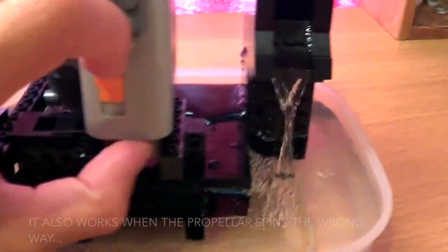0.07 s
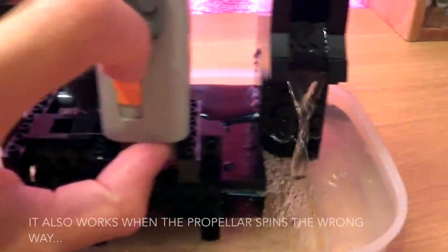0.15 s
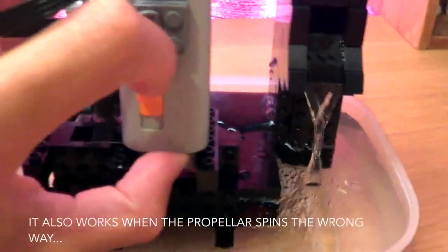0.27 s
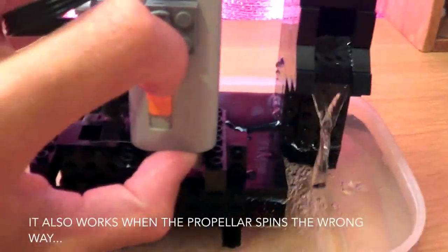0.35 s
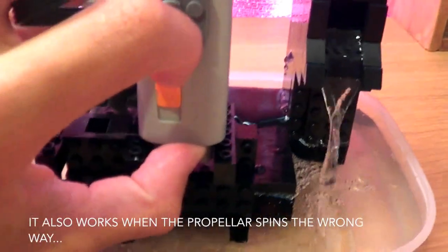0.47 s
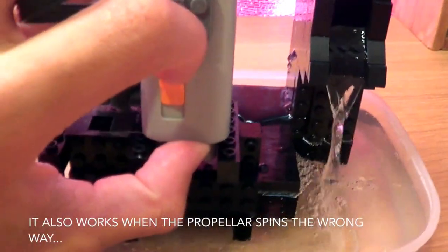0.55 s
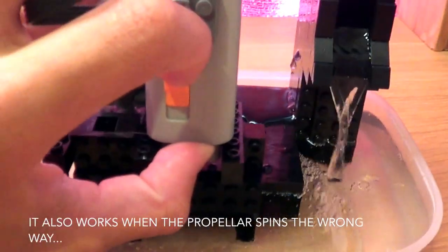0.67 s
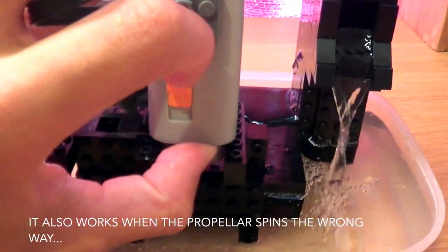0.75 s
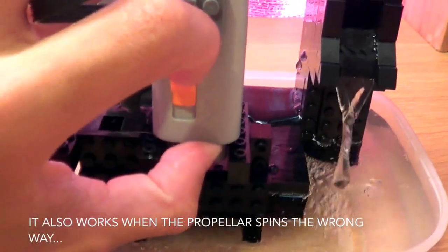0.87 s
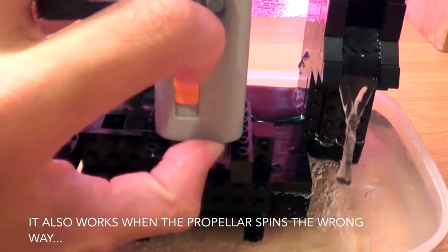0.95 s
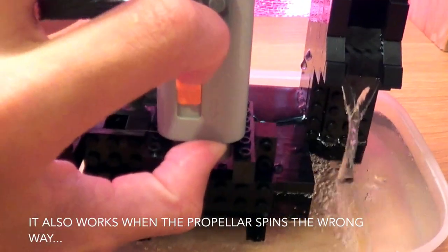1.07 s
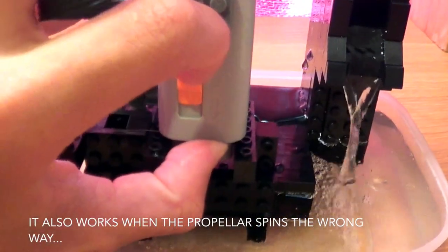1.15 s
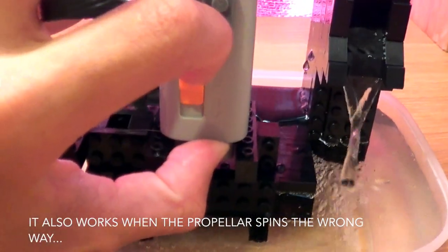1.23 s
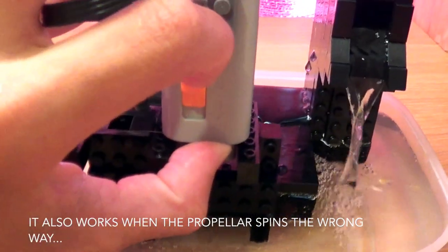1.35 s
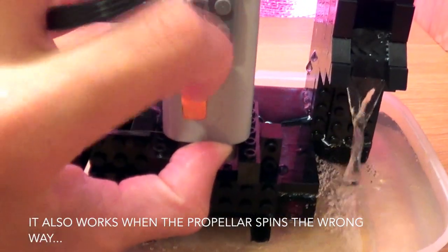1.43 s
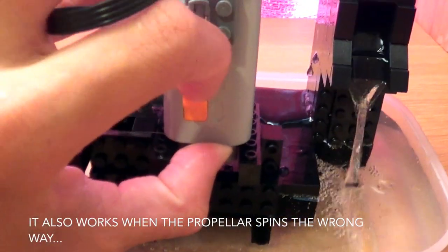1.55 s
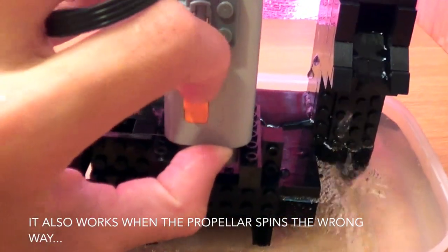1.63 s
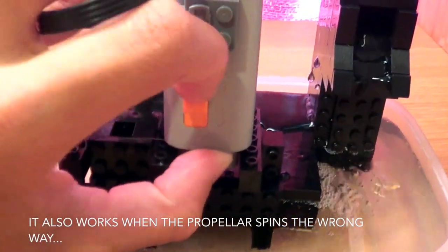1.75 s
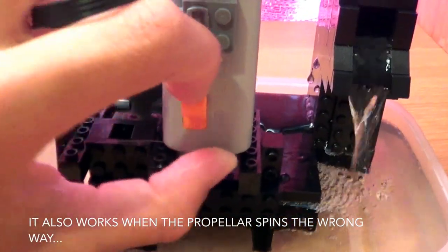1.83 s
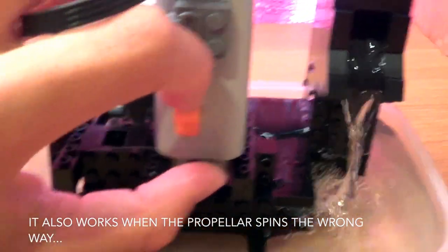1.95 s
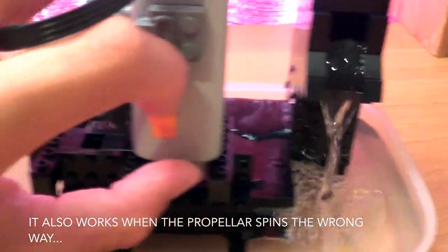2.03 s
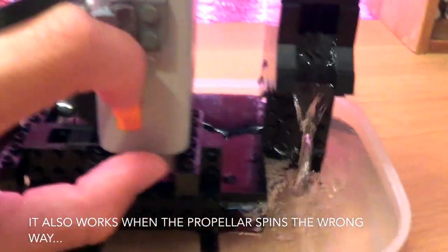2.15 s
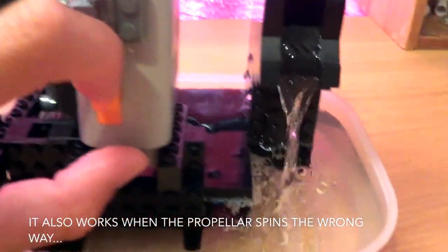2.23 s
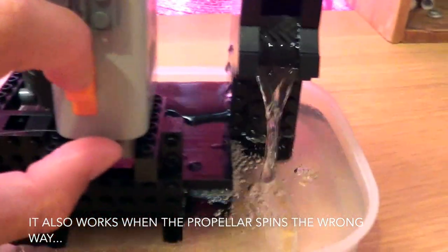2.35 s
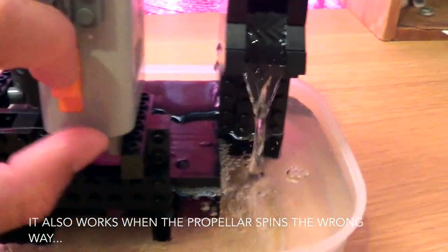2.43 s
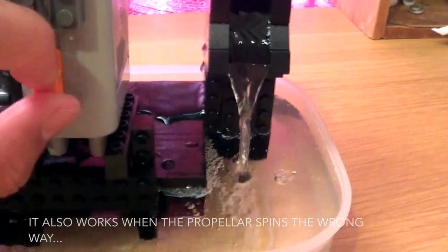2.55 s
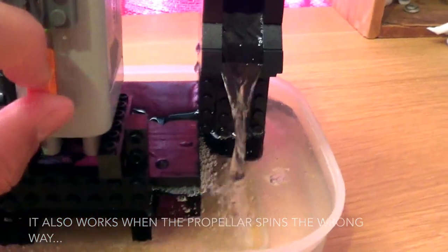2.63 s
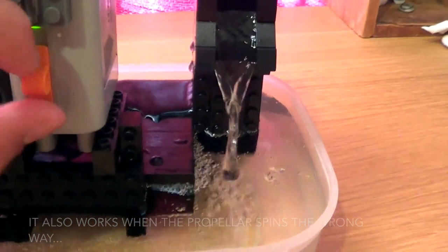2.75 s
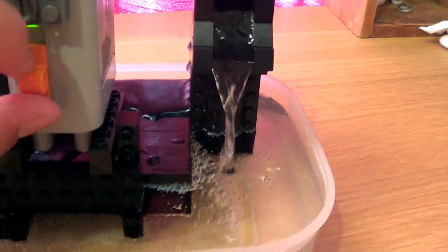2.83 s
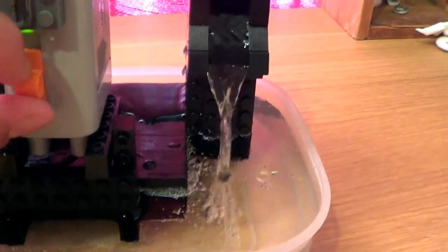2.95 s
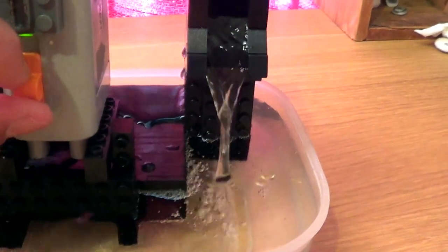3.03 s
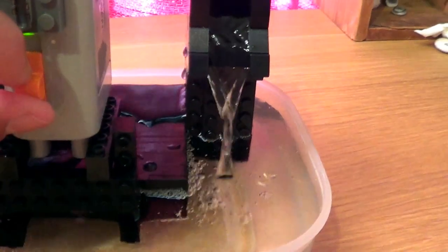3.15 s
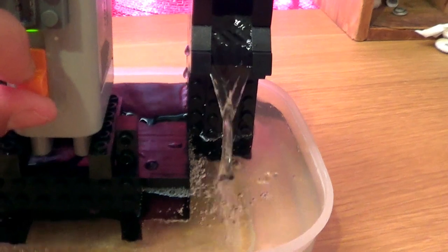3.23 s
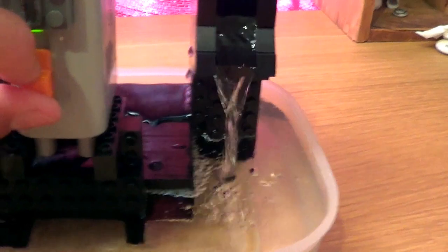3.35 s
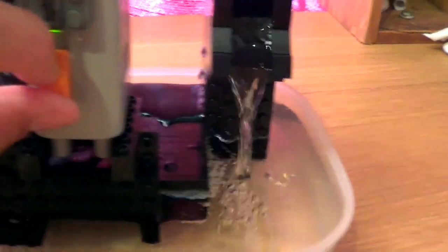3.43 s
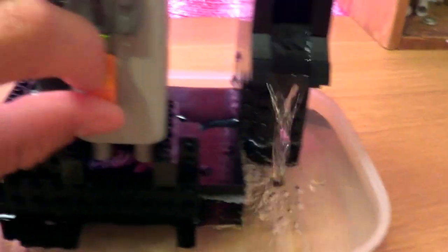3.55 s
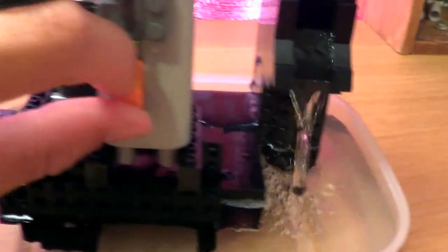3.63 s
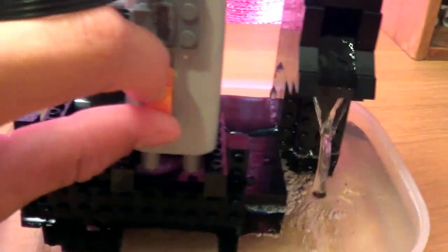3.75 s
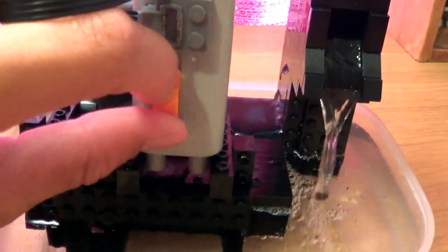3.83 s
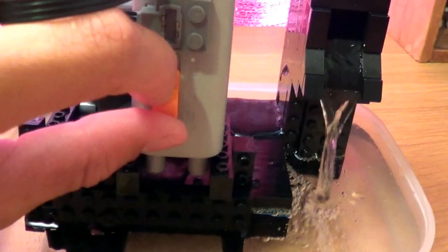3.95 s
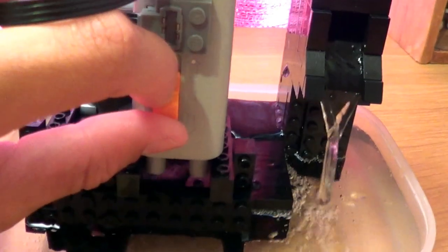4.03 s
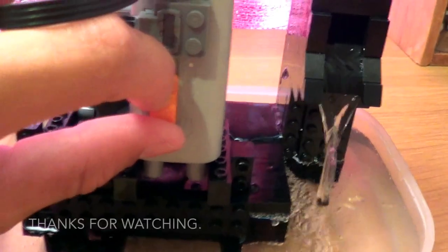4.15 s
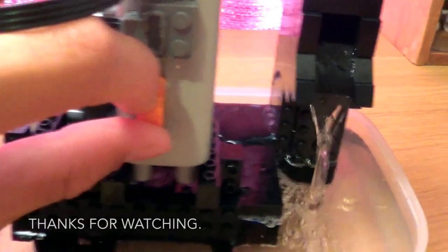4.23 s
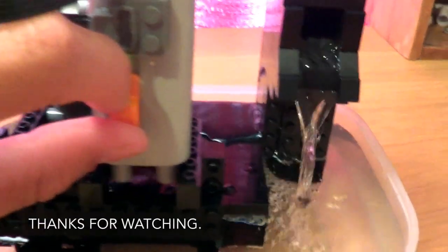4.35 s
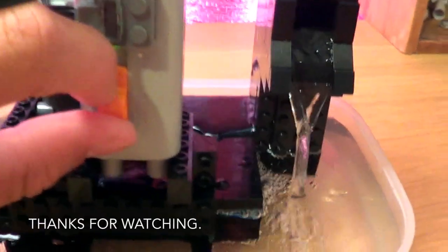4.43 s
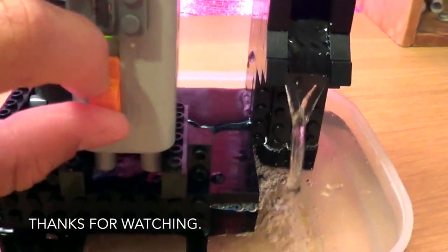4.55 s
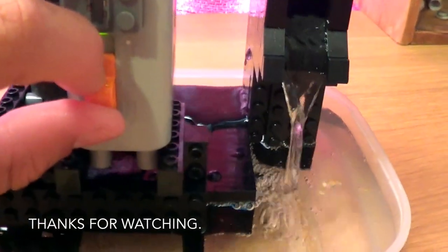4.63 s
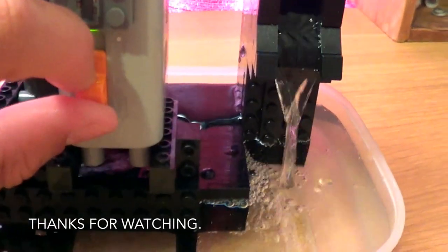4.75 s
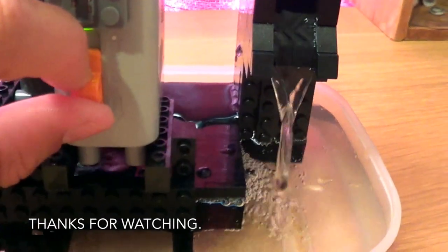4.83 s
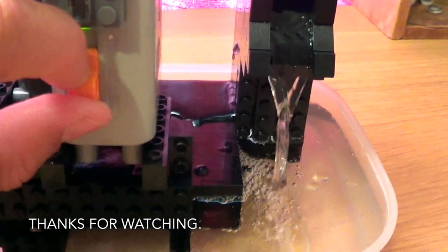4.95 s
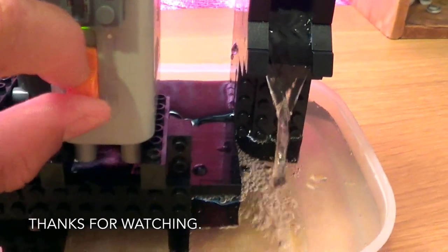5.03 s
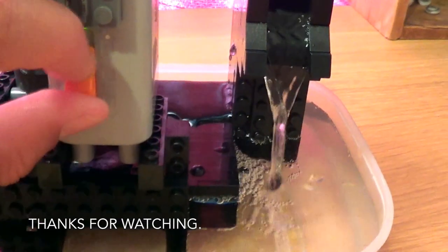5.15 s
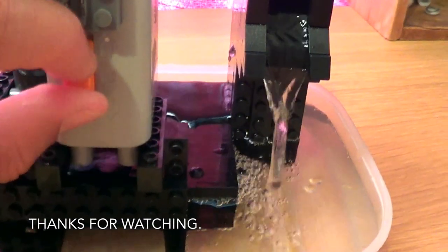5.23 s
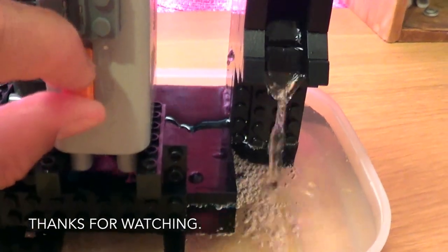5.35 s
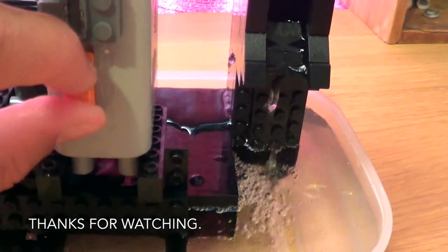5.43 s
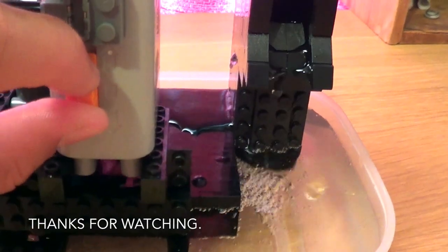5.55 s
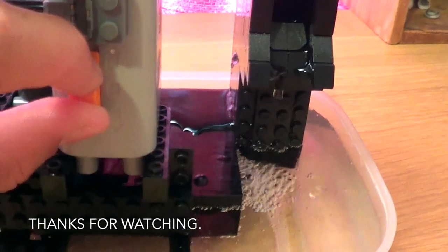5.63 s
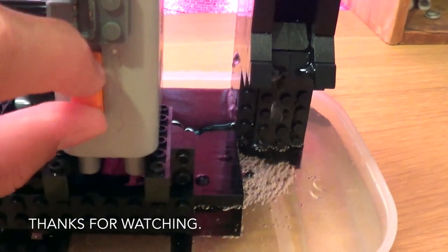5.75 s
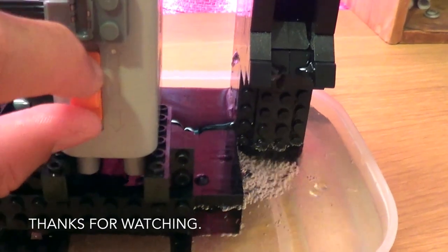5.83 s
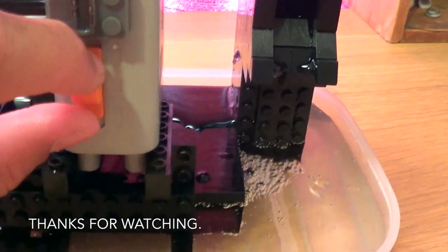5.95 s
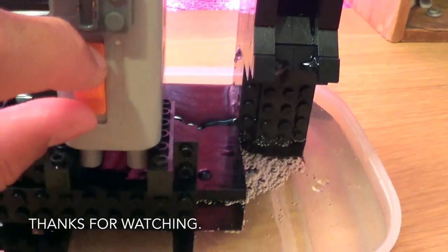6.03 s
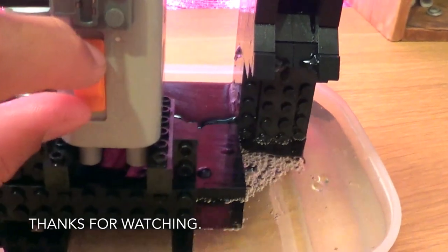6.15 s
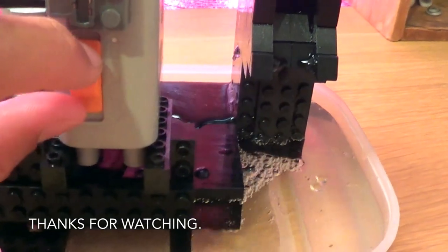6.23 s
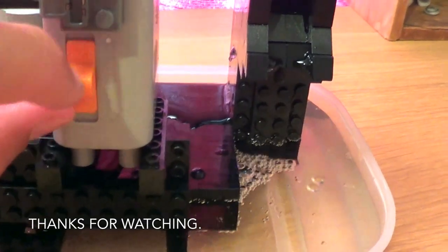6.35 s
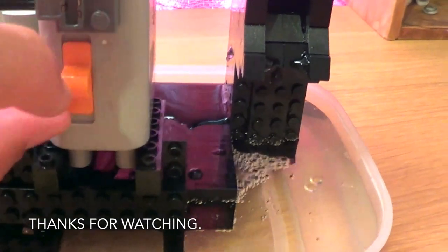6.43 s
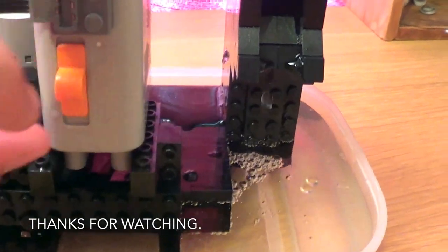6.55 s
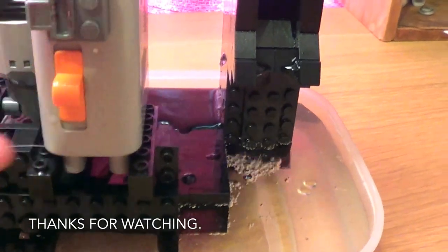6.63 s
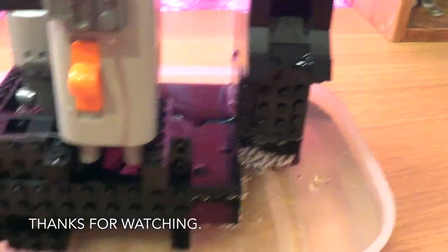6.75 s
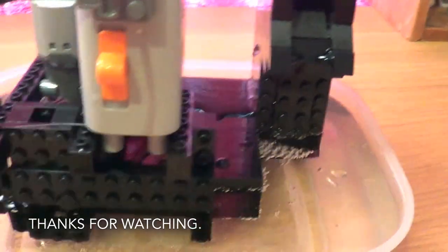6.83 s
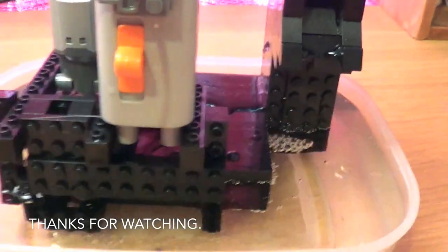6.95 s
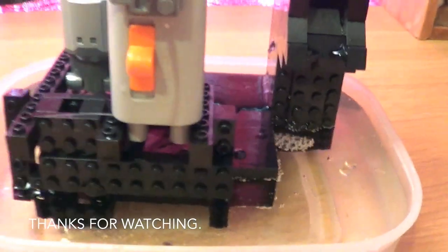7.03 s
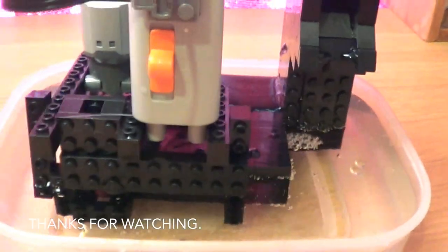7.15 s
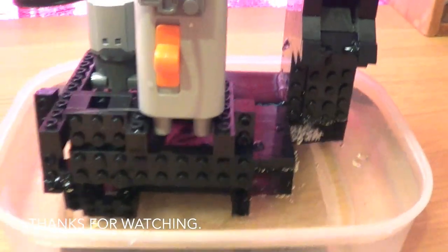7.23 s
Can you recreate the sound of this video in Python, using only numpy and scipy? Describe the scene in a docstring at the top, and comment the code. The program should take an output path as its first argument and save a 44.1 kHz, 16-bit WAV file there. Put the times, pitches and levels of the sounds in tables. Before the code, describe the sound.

Very close, a toy motor drives a harsh, bright plastic gear clatter with a faint whine, over a thin bubbling jet of water. A sharp double click makes it dip and spin up again in reverse. Later it winds down fast with a click; water gurgles and splutters, drops tick, foam fizzes, and fingers slide and click on plastic. Small dry room, faint hiss.

```python
"""In a tub of water, close by, a toy motor drives a plastic-brick pump: it runs one way, is reversed, and is switched off.
Gear teeth strike and scrape, exciting the resonances of the frame, over the bubbles of a thin splashing jet.
Afterwards the water drains with gurgling bubbles, and drops and foam tick as short damped rings.
Fingers slide on the battery box as coloured grains of friction; the switch and loose plastic click as noise bursts."""
import sys
import numpy as np
from scipy import signal
from scipy.fft import rfft, irfft
from scipy.io import wavfile
from scipy.ndimage import uniform_filter1d

SR = 44100
rng = np.random.default_rng(int(sys.argv[2]) if len(sys.argv) > 2 else 0)


def dump(signal):
    """Clip the signal to [-1, 1] and save it as 16-bit WAV at the path in sys.argv[1]."""
    limited = np.clip(np.atleast_2d(signal).T, -1, 1)
    pcm = np.round(limited * 32767).astype(np.int16)
    wavfile.write(sys.argv[1], SR, pcm)


N = 321043
TIME = np.arange(N) / SR

# the switch cuts the forward run, starts the reverse run, and at last turns the motor off (s)
CUT_S, REVERSE_S, OFF_S = 1.52, 1.529, 5.26


def gain_of(db):
    """Level in decibels to amplitude ratio."""
    return 10 ** (np.asarray(db) / 20)


def evened(x):
    """Normalises the mean power: rms 1."""
    return x / np.sqrt(np.mean(x ** 2) + 1e-20)


def read(points, hz):
    """Interpolates a spectrum along a logarithmic frequency axis."""
    f, value = np.transpose(points)
    return np.interp(np.log(hz + 1), np.log(f + 1), value)


def add(mix, s, sound):
    """Superposition: adds a sound to the mix from time s on."""
    part = mix[max(round(s * SR), 0):][:len(sound)]
    part += sound[:len(part)]


def pair(mid, side):
    """Sum and difference stereo: left and right from what they share and what differs."""
    return np.array([mid + side, mid - side])


def stroke(s, db, rise_s, fall_s):
    """Gaussian envelope: a smooth swell to a peak and away again, with 1/e times for the two sides."""
    return gain_of(db) * np.exp(-((TIME - s) / np.where(TIME < s, rise_s, fall_s)) ** 2)


def colour(x, db_at, size=4096):
    """Minimum-phase filtering with the gain db_at(Hz): causal, so blows ring after they land."""
    cepstrum = irfft(np.log(gain_of(db_at(np.fft.rfftfreq(size, 1 / SR))) + 1e-6))
    # folding the cepstrum onto positive times makes the filter causal
    cepstrum[1:size // 2] *= 2
    cepstrum[size // 2 + 1:] = 0
    response = irfft(np.exp(rfft(cepstrum)))
    return signal.oaconvolve(x, response)[:len(x)]


def wander(hz):
    """Low-passed Gaussian noise: slow chance of rms 1, up to about hz."""
    lowpass = np.exp(-(np.fft.rfftfreq(N, 1 / SR) / hz) ** 2)
    return evened(irfft(rfft(rng.standard_normal(N)) * lowpass, N))


def sparks(per_s, spread_db):
    """Poisson-like impulses of random sign, their levels spread exponentially."""
    level_db = spread_db * np.minimum(rng.exponential(1, N), 4)
    size = gain_of(level_db) * rng.choice([-1, 1], N)
    return size * (rng.random(N) < per_s / SR)


def bubble(hz, t60, rise):
    """Resonance of an air bubble: a damped ring that starts at hz and rises in pitch as it dies."""
    t = np.arange(int(abs(t60) * SR) + 2) / SR
    ring = np.sin(2 * np.pi * hz * t * (1 + rise * t / t60))
    decay = np.exp(-np.log(1000) * t / t60)
    onset = 1 - np.exp(-hz * t)
    return ring * decay * onset


def bubbles(per_s, low_hz, high_hz, cycles, spread_db, rise, count=30):
    """Superposed bubble resonances: each size rings at its own pitch on its own random train."""
    pitches = np.geomspace(low_hz, high_hz, count) * np.exp(0.0093 * rng.standard_normal(count))
    return sum(signal.oaconvolve(sparks(per_s / count, spread_db), bubble(hz, cycles / hz, rise))[:N]
               for hz in pitches)


def background(level_db, wide_db):
    """Diffuse room noise, wide in the middle range and near mono in bass and treble, with an electronic whine."""
    # spectrum of the room behind the pump: f/Hz, level/dB
    floor = [(15, -36), (25, 0.5), (213, 4.5), (637, -3.5), (1150, -5.5), (1910, -9.5), (2180, -5.5),
             (2780, -10), (5420, -11.5), (7890, -13.5), (10300, -11.5), (13100, -21), (15000, -9)]
    whine_hz, whine_db = 15624, -55
    spread = [(40, -18), (300, 3), (4000, 1.5), (14000, -18)]  # side: f/Hz, level/dB
    air = evened(colour(rng.standard_normal(N), lambda hz: read(floor, hz)))
    diffuse = evened(colour(rng.standard_normal(N), lambda hz: read(floor, hz) + read(spread, hz)))
    pulsing = 1 + .5 * np.sin(2 * np.pi * 50 * TIME)
    whine = np.sin(2 * np.pi * whine_hz * TIME) * pulsing
    return gain_of(level_db) * pair(air, gain_of(wide_db) * diffuse) + gain_of(whine_db) * whine


def room(x, t60):
    """Reverberation: sparse reflections from tub, table and walls that die away exponentially."""
    t = np.arange(SR // 2) / SR
    arrivals = (rng.random(len(t)) < 3000 / SR) * (t > .002)
    taps = rng.standard_normal(len(t)) * arrivals * np.exp(-np.log(1000) * t / t60)
    return signal.oaconvolve(x, taps / np.linalg.norm(taps))[:N]


def hands(bump_db, bump_hz):
    """Friction as random grains: a finger slides off the box, the hand draws back; a soft bump comes early."""
    # colour of skin sliding over plastic: f/Hz, level/dB
    slide_colour = [(120, -43), (200, -11), (963, -22), (1050, 0), (1150, -18), (2090, -3), (4010, -8.5),
                    (8410, 0.5), (15000, -9)]
    # colour of the hand rustling away: f/Hz, level/dB
    rustle_colour = [(35, -59), (60, -20), (329, 0), (665, -7), (743, -15), (1230, -11), (2570, -15),
                     (5000, -14), (6500, -49), (11000, -120)]
    slide_s, hand_s = 6.68, 7.0  # peaks of the two movements
    grain = evened(sparks(4000, spread_db=0))
    slide = evened(colour(grain, lambda hz: read(slide_colour, hz)))
    slide = slide * stroke(slide_s, db=-40, rise_s=0.053, fall_s=0.14)
    rustle = evened(colour(rng.standard_normal(N), lambda hz: read(rustle_colour, hz)))
    rustle = rustle * stroke(hand_s, db=-51.5, rise_s=0.13, fall_s=0.16)
    out = slide + rustle
    add(out, .122, gain_of(bump_db) * bubble(bump_hz, t60=0.081, rise=0))
    return out


def clicks(trim_db, decay_s):
    """Impact: short dry noise cracks of plastic, each with a weaker rebound."""
    # switch and loose plastic: t/s, peak level before the trim/dB, tilt/(dB per octave)
    cracks = [(1.5218, -11, 7), (1.5255, -5, 2.5), (2.018, -16.5, -6), (5.293, -13.5, -3.5),
              (5.379, -16.5, -1), (5.834, -31.5, 1), (5.842, -32, -2.5), (6.388, -30, 2.5), (6.515, -26, 2),
              (6.666, -18, -1), (6.800, -25, 2), (6.818, -23.5, 1.5), (6.841, -22, 0.5), (6.885, -29, 2),
              (6.894, -25, 0)]
    # resonances of the plastic: f/Hz, level/dB
    click_colour = [(88, -44), (150, -1), (766, -9.5), (2140, 0), (2600, -3.5), (3620, -1.5), (4650, -5.5),
                    (5440, -1), (9180, -2.5), (10500, -1.5), (11400, -10), (13300, -17), (15500, -13)]
    rebound_s, rebound_db = .0035, -9.5
    out, t = np.zeros(N), np.arange(2000) / SR
    rebound = gain_of(rebound_db) * (t > rebound_s) * np.exp(-abs(t - rebound_s) / decay_s)
    decay = np.exp(-t / decay_s) + rebound + 0.14 * np.exp(-t / 0.022)
    for s, db, tilt_db in cracks:
        def tilted(hz):
            """Plastic resonances with a spectral tilt above 900 Hz."""
            return read(click_colour, hz) + tilt_db * np.log2(np.maximum(hz, 900) / 3000)

        crack = colour(rng.standard_normal(len(t)) * decay, tilted)
        add(out, s, gain_of(db + trim_db) * crack / abs(crack).max())
    return out


def drop(hz, snap=0.18):
    """Impact and bubble resonance: one drop of peak 1, a snap of noise and a short ring."""
    t = np.arange(600) / SR
    snap_colour = [(1500, -12), (4500, -4), (7500, 13), (15000, 6.0)]  # f/Hz, level/dB
    burst = rng.standard_normal(len(t)) * np.exp(-t / 0.0013)
    tick = snap * colour(burst, lambda f: read(snap_colour, f))
    add(tick, 0, bubble(hz, t60=.0035, rise=.06))
    return tick / abs(tick).max()


def draining(drop_db, drip_db, foam_db, drip_spread_db=3, drip_low_hz=8000, drip_high_hz=11000):
    """Bubble resonance at all sizes: large bubbles gurgle, drops tick, and the foam fizzles out."""
    # large bubbles as the jet plunges and the pump drains: t/s, level before the decay/dB, f/Hz, t60/s
    gurgles = [(3.585, -30, 388, .1), (5.46, -40, 603, .2), (5.476, -39, 285, 0.25),
               (5.503, -34, 1800, .025), (5.519, -36, 360, 0.293)]
    # the loudest drops: t/s, peak level before drop_db/dB, f/Hz
    loud_drops = [(5.439, -17, 6440), (5.5044, -21.5, 9280), (5.5323, -21.5, 9680), (5.5846, -23, 11100),
                  (5.626, -22, 7660), (5.73, -22, 7750), (5.7523, -18, 9360), (5.894, -25, 9810),
                  (5.9539, -22, 10300), (6.0815, -19, 7840), (6.1175, -24, 8000), (6.1465, -20, 10000),
                  (6.1924, -26, 10300), (6.2253, -29, 10600), (6.2577, -30, 10200), (6.292, -26.5, 8180),
                  (6.349, -25, 9510), (6.5887, -24.5, 7970), (7.0953, -26, 10800)]
    # small drops and foam are thickest soon after the stop, then thin out
    peak_s, fade_s, drips_per_s, pops_per_s = 5.95, 0.72, 24, 425
    out = np.zeros(N)
    for s, db, hz, t60 in gurgles:
        ring = bubble(hz, t60, rise=0.15)
        swell = np.minimum(np.linspace(0, 10, len(ring)), 1)  # the neck closes gradually
        add(out, s, gain_of(db) * ring * swell)
    for s, db, hz in loud_drops:
        add(out, s, gain_of(db + drop_db) * drop(hz))
    wet = np.exp(-abs(TIME - peak_s) / fade_s) * (TIME > OFF_S)
    foam = bubbles(pops_per_s * wet, low_hz=8200, high_hz=14000, cycles=7.5, spread_db=3.0, rise=.1)
    for s in TIME[rng.random(N) < drips_per_s * wet / SR]:
        level_db = drip_db + drip_spread_db * rng.uniform(-1, 1)
        add(out, s, gain_of(level_db) * drop(rng.uniform(drip_low_hz, drip_high_hz)))
    return out + gain_of(foam_db) * evened(foam)


def splutter(level_db):
    """Bubble resonance in a last flurry as the spout runs dry."""
    per_s = 450 * stroke(5.5, db=0, rise_s=.07, fall_s=.07)
    flurry = bubbles(per_s, low_hz=1600, high_hz=4800, cycles=24, spread_db=3.5, rise=.08)
    return gain_of(level_db) * flurry


def motor_speed():
    """Rotor dynamics as a share of full speed: steady, exponential spin-up after reversal, even friction braking."""
    start_speed, spin_up_s, coast_s = .43, .047, .225  # share of full speed, time constant, time to rest
    lack = (1 - start_speed) * np.exp(-abs(TIME - REVERSE_S) / spin_up_s) * (TIME > CUT_S)
    coast = np.minimum(1 - (TIME - OFF_S) / coast_s, 1)
    return np.clip((1 - lack) * coast, 1e-3, 1)


def jet(splash_db, plop_db, surge_db=5.6):
    """Air entrainment: the jet plunges in surges; its flow follows the motor as a first-order lag."""
    # swells of the jet: t/s, level/dB
    swells = [(1.65, 2), (3.05, 4.5), (4.4, 1), (4.9, 4)]
    lag_s, swell_s = 0.043, 0.21  # time constant, half length of a swell
    keep = np.exp(-1 / (lag_s * SR))
    flow = 1 - signal.lfilter([1 - keep], [1, -keep], 1 - motor_speed())
    flow = flow * gain_of(sum(db * stroke(s, 0, swell_s, swell_s) for s, db in swells))
    surge = gain_of(surge_db * np.tanh(wander(23)))
    splash = bubbles(900, low_hz=1734, high_hz=3290, cycles=20.0, spread_db=3, rise=.04)
    plops = bubbles(700, low_hz=240, high_hz=1510, cycles=4.5, spread_db=0.5, rise=0.032)
    return flow * (gain_of(splash_db) * evened(splash * surge) + gain_of(plop_db) * evened(plops * surge))


def whir(speed, tones):
    """Rotational tones: pitch and level follow the motor, and waver as the water drags at the propeller."""
    drag, out = wander(15.76), np.zeros(N)
    # the gears strain hardest just before they reach full speed
    strain = stroke(1.61, db=0, rise_s=.03, fall_s=.03)
    for hz, db, waver, flutter_db, strain_db in tones:
        turns = np.cumsum(speed * hz * (1 + waver * drag * (1 - strain))) / SR
        tone = evened(np.sin(2 * np.pi * turns) * gain_of(flutter_db * wander(39)))
        out += gain_of(db + strain_db * strain) * tone
    return speed * out


def teeth(speed, uneven_db, rattle_db, scrape_db, wobble_db):
    """Gear-mesh excitation: a knock for each tooth, loose rattles, and scraping while a tooth slides."""
    mesh_hz, shaft_hz = 326.6, 28.87  # mean rates at full speed
    run = np.cumsum(speed * (1 + .016 * wander(8))) / SR  # running time as if at full speed
    mesh = mesh_hz * run
    contact = np.diff(np.floor(mesh), prepend=0)
    knocks = contact * gain_of(uneven_db * rng.uniform(-1, 1, N)) * rng.choice([-1, 1], N)
    rattles = sparks(2200 * speed, spread_db=-0.5)
    slip = 0.91 + np.exp(-(mesh % 1) / 0.51)  # strongest as a tooth takes the load
    scrape = slip * rng.standard_normal(N) * speed
    force = evened(knocks) + gain_of(rattle_db) * evened(rattles) + gain_of(scrape_db) * evened(scrape)
    # the shaft runs out of true, so the load swells once a turn
    return force * gain_of(wobble_db * np.sin(2 * np.pi * shaft_hz * run) + 0.64 * wander(56))


def gearbox(grip, modes, tones, ring_db, ring_width_hz=300, flicker_db=2):
    """Forced resonance: teeth shake the frame; its strongest ring and its treble shift with the grip of the hand."""
    clatter_db, clatter_power = -16.5, 2.17  # level at full speed; growth as a power of the speed
    s, treble_db, ring_hz = np.transpose(grip)
    speed = motor_speed()
    centre, width, height_db = np.transpose(modes)[:, :, None]

    def frame(hz):
        """Modal sum: gain in dB of all resonances together, with no deep bass."""
        power = (gain_of(height_db) ** 2 / (1 + (2 * (hz - centre) / width) ** 2) ** 2).sum(0)
        return 10 * np.log10(power / (1 + (45 / (hz + 1)) ** 4))

    force = teeth(speed, uneven_db=2.75, rattle_db=2, scrape_db=7, wobble_db=0.66)
    hz, t, z = signal.stft(colour(force, frame), SR, nperseg=512, noverlap=384)
    hz = hz[:, None]
    # loose bricks touch and part, so the ring comes and goes
    strength_db = ring_db + flicker_db * np.interp(t, TIME, wander(9.6))
    ring = strength_db * np.exp(-((hz - np.interp(t, s, ring_hz)) / ring_width_hz) ** 2)
    shade = np.interp(t, s, treble_db) * .5 * (1 + np.tanh((hz - 10500) / 700))
    sound = signal.istft(z * gain_of(ring + shade), SR, nperseg=512, noverlap=384)[1][:N]
    # the running rms is levelled, so that the speed alone sets the loudness
    clatter = sound / np.sqrt(abs(uniform_filter1d(sound ** 2, size=4000)) + 1e-12)
    return (clatter + whir(speed, tones)) * gain_of(clatter_db) * speed ** clatter_power


def scene():
    """Superposition in stereo: the pump sits a little left of the middle; reflections give the width."""
    # frame resonances, pressed by one or the other flank of the teeth: f/Hz, width/Hz, level/dB
    frame_forward = [(80, 37, -15), (209, 99, -8), (267, 23, -6.5), (335, 41, -12.5), (416, 72, -12.5),
                     (650, 165, -13), (790, 370, -13), (1193, 230, -9.5), (1430, 130, -12), (2113, 490, -5),
                     (2470, 155, -3.5), (2650, 250, -5.5), (3400, 990, -13.5), (4760, 820, -6.5),
                     (5280, 370, -5.5), (6250, 570, -7), (7380, 2400, -1.5), (8240, 100, 3.5),
                     (9130, 2300, 0), (11700, 800, -6), (13200, 1500, -4), (14799, 1400, -6.5)]
    frame_reverse = [(78.6, 29, -13.5), (223.4, 96, -9), (276.4, 15.5, -5.5), (383, 59, -14),
                     (443, 31, -10.5), (624, 155, -13.5), (824, 90, -9), (1190, 325, -11),
                     (1857, 290, -8.5), (2175, 210, -4.5), (2443, 130, -5), (2710, 260, -5),
                     (3300, 1170, -12), (4240, 400, -6.5), (4840, 350, -10), (5510, 200, -7.5),
                     (6420, 160, -4), (7030, 860, -0.3), (8440, 3200, -0.24), (10280, 400, -11),
                     (11950, 650, -6), (13270, 2700, -8), (15339, 1900, -14)]
    # tones of motor and gears at full speed:
    # f/Hz, level against the clatter/dB, waver/share of the pitch, flutter/dB, extra level under strain/dB
    tones_forward = [(211.4, -28, 0.021, 3.5, 0), (2370, -18, 0.0179, 3, 0)]
    tones_reverse = [(212, -35, .02, 3, 8), (828, -32.5, .005, 1.5, 0), (2425, -21, .016, 3, 9)]
    # colour of the frame as the grip shifts: t/s, treble level/dB, strongest ring f/Hz
    grip_forward = [(0, -.5, 6800), (.3, 2, 7420), (1.5, -0.5, 7250)]
    grip_reverse = [(1.62, -1, 9000), (2.0, 3.5, 8600), (2.2, 2.5, 8180), (3.0, -.5, 8700), (3.9, 0, 8440),
                    (5.25, 0, 8600)]
    # filter on the pump's reflections in the side channel: f/Hz, level/dB
    side_width = [(40, -31), (170, -15), (330, -9), (700, -6.5), (1400, -12), (2500, -31), (5000, -14.5),
                  (7000, -14.5), (9500, -39), (15000, -60)]
    # direct sound of the pump, left against right: f/Hz, level/dB
    left_lean = [(200, 0), (500, -.5), (1290, 0), (2380, .8), (4400, 1.5), (8120, .3), (15000, .1)]

    forward = gearbox(grip_forward, frame_forward, tones_forward, ring_db=4.0) * (TIME < CUT_S)
    reverse = gearbox(grip_reverse, frame_reverse, tones_reverse, ring_db=4) * (TIME > REVERSE_S)
    pump = forward + reverse + jet(splash_db=-37.0, plop_db=-43.5)
    small = clicks(trim_db=2.5, decay_s=0.0016) + hands(bump_db=-21, bump_hz=69)
    small = small + draining(drop_db=-0.5, drip_db=-31.5, foam_db=-59.5) + splutter(level_db=-44.5)
    mid = pump + small + gain_of(-14.5) * room(pump + small, t60=0.1)
    side = colour(room(pump, t60=0.094), lambda hz: read(side_width, hz))
    side = side + gain_of(-13) * room(small, t60=0.022)
    # half of the level difference goes to each ear
    lean_gain = gain_of(read(left_lean, np.fft.rfftfreq(N, 1 / SR)) / 2) - 1
    lean = irfft(rfft(pump) * lean_gain, N)
    return pair(mid, side + lean) + background(level_db=-50, wide_db=-2.0)


def record(dry):
    """Soft saturation and band limiting: the level dips briefly twice, tall peaks are rounded, the top is cut."""
    # brief dips of the level: t/s, half length/s
    dips = [(0.108, 0.012), (4.149, .013)]
    for s, half in dips:
        dry = dry * np.clip(abs(TIME - s) / half, .06, 1)
    rounded = dry / (1 + (dry / .62) ** 6) ** (1 / 6)
    lowpass = signal.firwin(1023, 15850, window=("kaiser", 9), fs=SR)  # cutoff in Hz
    return signal.oaconvolve(rounded, lowpass[None], "same")


dry = scene()
out = record(dry)
dump(out)
```